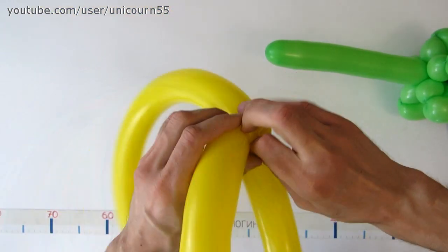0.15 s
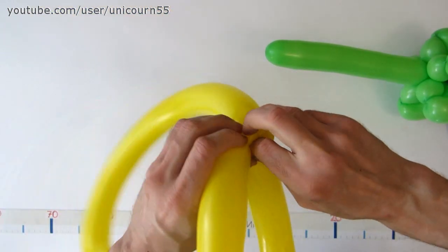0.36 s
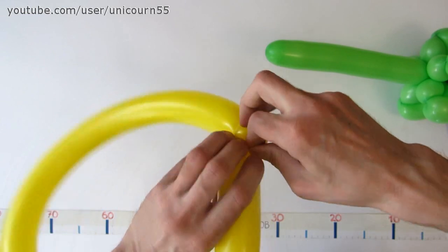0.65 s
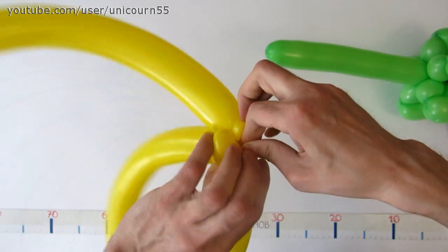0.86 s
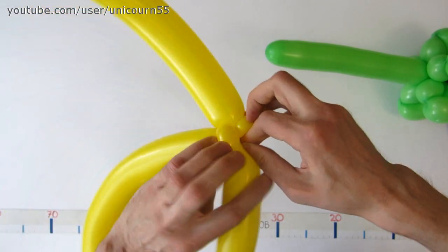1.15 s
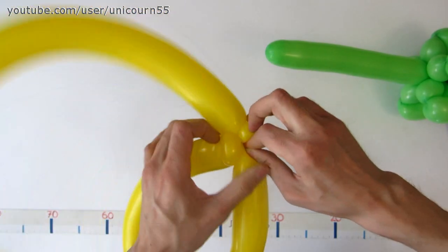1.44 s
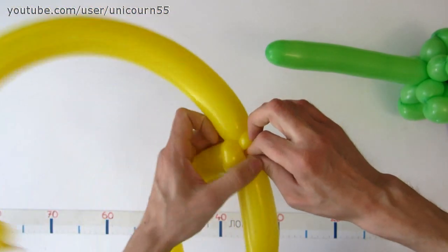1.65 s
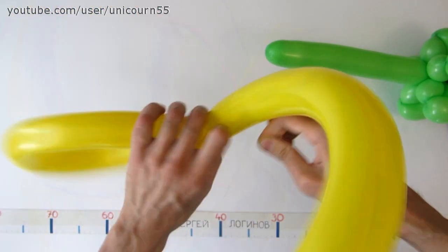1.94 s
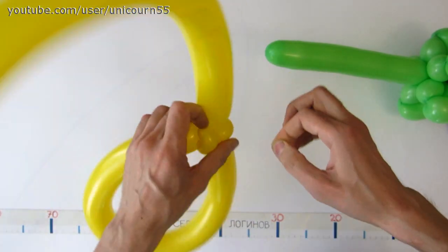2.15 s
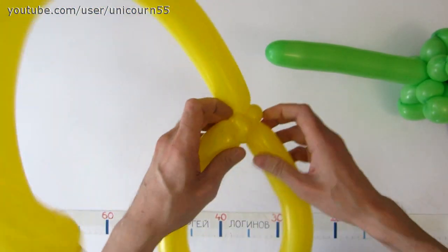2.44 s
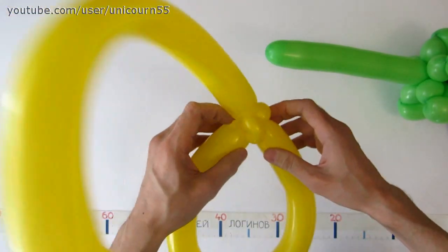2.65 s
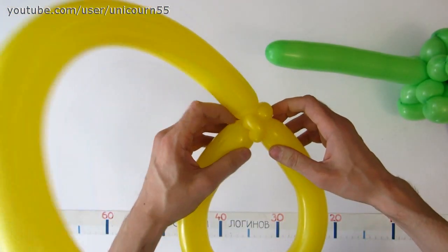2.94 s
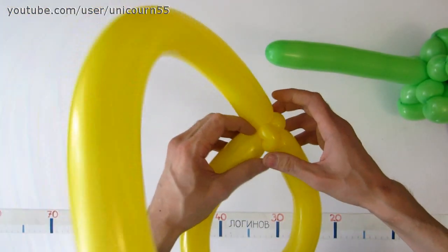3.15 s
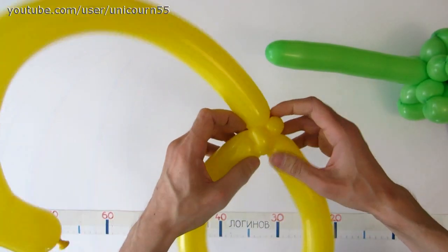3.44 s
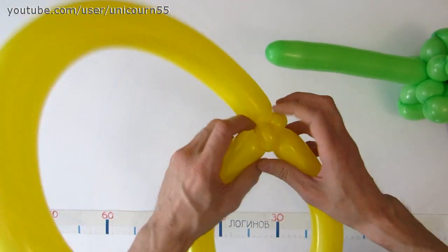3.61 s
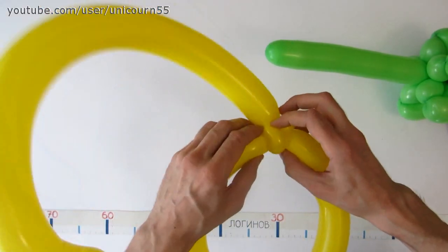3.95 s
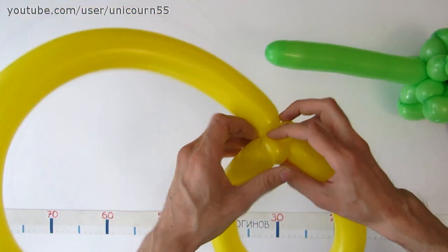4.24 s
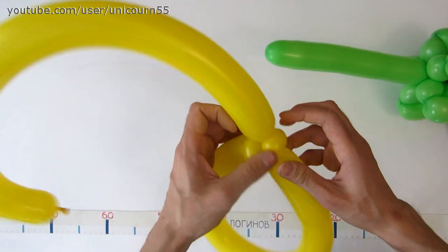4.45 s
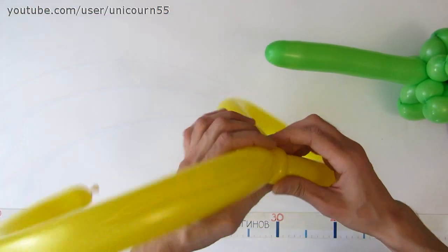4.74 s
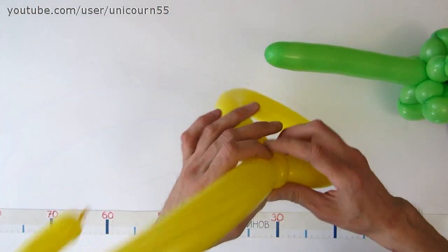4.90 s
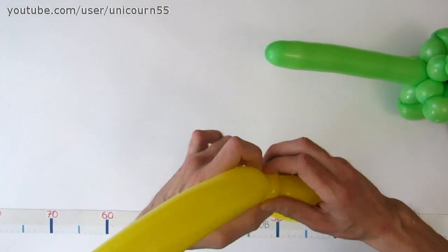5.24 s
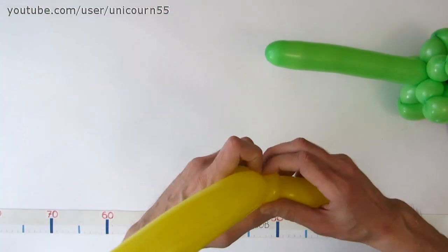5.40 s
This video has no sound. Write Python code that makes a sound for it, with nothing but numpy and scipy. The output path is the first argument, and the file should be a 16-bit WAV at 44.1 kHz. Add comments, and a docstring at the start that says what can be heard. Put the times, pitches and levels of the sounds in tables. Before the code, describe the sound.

Fingers twist a long, tight latex balloon, heard very close in a quiet, dry room. From 0 to 1.1 s, gritty rubber crackle is mixed with irregular bright snaps, a short low creak near 0.7 and a tiny high squeak just after 1.0. It drops almost to silence around 1.25, with a soft bump and small creak at 1.3. Strong snaps cluster from 1.55 to 1.85, ending in a hard, hollow knock. From about 1.95 to 2.4 only faint ticks and thin squeaks remain. Light scrapes then build; a short, low rubbery squawk comes at 3.4 and rough creaks at 3.75. From 4 s rubbing thickens with frequent snaps, especially at 4.4, 5.0 and a sharp one at 5.1, followed by a brief squeaky groan. Crackling continues to the end at about 5.5. Tight hollow tails, low handling rumble and faint hiss; stereo leans left.

```python
"""At a table, close to a microphone with two openings, fingers twist a long latex balloon.
Rubber sticks and slips on skin and rubber: dense tiny slips crackle, large ones snap, and
regular ones creak or squeak. Every slip rings the tight rubber wall, runs along the air tube
inside and dies in a short tail. Soft bumps, a low rumble and a faint hiss lie with them."""
import sys
import numpy as np
from scipy import signal
from scipy.fft import rfft, irfft, next_fast_len
from scipy.io import wavfile
from scipy.ndimage import uniform_filter1d

SR = 44100
rng = np.random.default_rng(int(sys.argv[2]) if len(sys.argv) > 2 else 0)


def generate_wav(sig):
    """Save sig (samples, or channels by samples) to the path in sys.argv[1] as 16-bit PCM at SR."""
    pcm = np.round(np.clip(np.atleast_2d(sig).T, -1, 1) * 32767).astype(np.int16)
    wavfile.write(sys.argv[1], SR, pcm)


N = 245681

# single large slips, levels ahead of boost, tube and microphone:
# (time [s], peak level [dB], centre of colour [Hz])
SNAPS = [(0.0762, -15, 4250), (0.1057, -13, 4770), (0.1104, -13, 3350), (0.182, -9, 6850),
         (0.188, -7, 4600), (0.1984, -9, 7210), (.2095, -15, 6000), (0.3541, -14, 5390), (0.4199, -8, 3590),
         (0.5028, -12, 5270), (.5165, -13, 5500), (0.5701, -11, 4900), (.603, -18, 4270),
         (0.6384, -13, 4470), (0.7034, -11, 2620), (0.7364, -11, 2800), (0.7776, -8, 2950),
         (0.8155, -5, 5800), (0.835, -12, 3060), (0.8684, -7, 3600), (0.8969, -8, 3140), (.9515, -17, 4000),
         (.9665, -18, 4500), (.9842, -19, 6500), (.9986, -14, 4900), (1.143, -18, 4500),
         (1.1485, -14, 5800), (1.3049, -34, 5000), (1.3239, -22, 5450), (1.3415, -19, 4500),
         (1.3665, -19, 1800), (1.379, -21, 2200), (1.476, -18, 3210), (1.5409, -17, 3020),
         (1.5733, -2, 6220), (1.6267, -9, 4980), (1.6721, -12, 3880), (1.6836, -4, 3540),
         (1.6934, -6, 3560), (1.713, -5, 5940), (1.7734, -18, 3180), (1.7894, -16, 2680),
         (1.8277, -11, 2680), (1.8397, -6, 3910), (1.8497, -6, 3370), (2.051, -28, 2600),
         (2.1445, -25, 2560), (2.2475, -25, 3000), (2.3191, -26, 3200), (2.4394, -18, 2520),
         (2.588, -20, 4500), (2.6239, -24, 3200), (2.811, -23, 3340), (2.8719, -19, 2850),
         (2.8833, -18, 3550), (2.9312, -22, 3640), (3.0315, -18, 3600), (3.0405, -15, 3510),
         (3.0645, -19, 4500), (3.1537, -17, 4730), (3.1951, -14, 2760), (3.5129, -22, 3960),
         (3.5379, -21, 4540), (3.5703, -19, 3240), (3.595, -20, 1900), (3.701, -17, 2500),
         (3.7368, -11, 2200), (3.8791, -23, 6200), (3.9055, -21, 3500), (4.0038, -15, 3240),
         (4.0253, -14, 6240), (4.0861, -14, 6140), (4.1714, -11, 2200), (4.2063, -13, 4570),
         (4.2418, -12, 3700), (4.3889, -7, 2970), (4.4408, -18, 2700), (4.533, -14, 2500),
         (4.5521, -13, 3380), (4.6409, -15, 3570), (4.702, -13, 4000), (4.7301, -13, 4930),
         (4.7446, -9, 2530), (4.8254, -13, 3040), (4.836, -15, 2500), (4.9187, -20, 3060),
         (4.9746, -7, 4500), (4.9874, -13, 2920), (5.0435, -15, 4000), (5.1113, -2, 4140),
         (5.1274, -13, 4060), (5.197, -19, 4500), (5.2066, -15, 6500), (5.2405, -12, 4000),
         (5.2584, -13, 3140), (5.2814, -16, 4710), (5.3018, -15, 6000), (5.3183, -13, 4500),
         (5.3911, -7, 4500), (5.4315, -16, 3500), (5.4575, -14, 5000)]
# broad modes, the ways the stretched wall can ring: (frequency [Hz], width [Hz], level [dB])
WALL = [(204, 40, -30.5), (345.4, 83, -9.5), (528, 295, -10), (748, 185, -3), (927, 383, -0.5),
        (1400, 520, -1), (1817, 427, -0.5), (2580, 790, -0.5), (3530, 1060, 1), (4840, 1390, -2),
        (6230, 940, -1), (6785, 2150, 0), (8600, 2650, -2), (11150, 3940, -7.5), (13800, 1000, -19)]
WALL_HZ, _, WALL_DB = np.transpose(WALL)


def amp(db):
    """Turns decibels into a plain factor."""
    return 10 ** (np.asarray(db) / 20)


def evened(x):
    """Scales a signal to an average strength (RMS) of 1."""
    return x / np.sqrt(np.mean(x ** 2) + 1e-20)


def read(points, hz):
    """Reads a (frequency, value) curve at any frequency, on a logarithmic frequency scale."""
    f, value = np.transpose(points)
    return np.interp(np.log(hz + 1), np.log(f + 1), value)


def shaped(x, gain):
    """Filters a sound by a function of frequency."""
    size = next_fast_len(N + SR)
    spectrum = rfft(x, size) * gain(np.fft.rfftfreq(size, 1 / SR))
    return irfft(spectrum, size)[..., :N]


def colour(centre_hz, fall_db):
    """Level of each wall mode: it falls away from a centre by fall_db an octave squared."""
    octaves = np.log2(WALL_HZ / np.asarray(centre_hz)[:, None])
    return -fall_db * octaves ** 2


def grip(s, order=1):
    """One column of the steady rubbing while the fingers hold the balloon, read at times s."""
    # steady rubbing: (time [s], level [dB], brightness [dB], level of the lowest modes [dB])
    holds = [(0, -44.5, -5.5, -4), (.07, -36.5, 1, 2.5), (.3, -35, -1, -8), (.6, -36.5, 1.5, 6.5),
             (.7, -30.5, 5, 1.5), (1.14, -40.5, -3.5, -1.5), (1.24, -82, 6, 1), (1.29, -61, -5, 10),
             (1.33, -51, 7, 6.5), (1.82, -32, -2, -14), (1.97, -53, -1, -9), (2.3, -50.5, 3.5, -2),
             (2.42, -40, 0.5, -0.5), (2.91, -44, -0.5, -4), (3.2, -36, 1, -1.5), (3.35, -39, -2.5, -1),
             (3.68, -34.5, -1.5, -0.5), (3.86, -37, -1, 1), (4, -37, -1.5, -5), (4.65, -31.5, -1.5, 2),
             (4.87, -34.5, -4.5, 0.5), (4.9, -40.5, -3.5, 3), (4.95, -34.5, 0, -2.5), (5.3, -34.5, -4, 6.5),
             (5.4, -36, 5, 1), (5.57, -34.5, -5, -14)]
    columns = np.transpose(holds)
    return np.interp(s, columns[0], columns[order])


def rubbing(s):
    """Crackle level in dB (slips x modes): steady grip, swelling scrapes and the trail of each snap."""
    # a finger scrapes the wall: (start [s], length [s], level [dB], centre of colour [Hz])
    scrapes = [(0.073, 0.042, -39, 2210), (0.173, 0.046, -34.5, 9000), (0.228, 0.025, -33, 9000),
               (0.332, 0.065, -33, 4860), (0.487, 0.06, -33.5, 6000), (0.656, 0.065, -37.5, 6600),
               (0.682, 0.14, -34.5, 2210), (0.833, 0.084, -33.5, 6030), (0.98, 0.018, -33.5, 830),
               (1.038, 0.011, -31, 6200), (1.116, 0.051, -37.5, 6030), (1.321, 0.067, -37.5, 600),
               (1.411, 0.023, -37.5, 600), (1.476, 0.14, -35, 2600), (1.661, 0.034, -32, 9000),
               (1.831, 0.031, -24, 1020), (1.87, 0.022, -38, 605), (2.017, 0.063, -49, 2750),
               (2.132, 0.061, -45, 6600), (2.212, 0.042, -44, 590), (2.312, 0.011, -50, 3300),
               (2.431, 0.048, -36, 1220), (2.536, 0.05, -41.5, 1860), (2.743, 0.035, -34.5, 1560),
               (2.942, 0.058, -37, 3570), (3.008, 0.047, -38, 3300), (3.137, 0.03, -32.5, 4130),
               (3.179, 0.052, -30, 9100), (3.395, 0.032, -32, 604), (3.726, 0.084, -29, 1640),
               (3.936, 0.066, -35.5, 990), (4.008, 0.083, -35, 8400), (4.073, 0.058, -31.5, 8300),
               (4.249, 0.029, -29.5, 2420), (4.48, 0.069, -37.5, 4030), (4.725, 0.046, -29, 1810),
               (4.818, 0.064, -37, 980), (5.005, 0.029, -41.5, 3650), (5.106, 0.023, -30.5, 3680),
               (5.447, 0.017, -30.5, 4930), (5.544, 0.02, -34, 9000)]
    rise_db_per_s, fall_db_per_s = 3000, 595  # slopes before and after a scrape
    scrape_swell_db = 2.5  # ends of a scrape under its middle
    scrape_fall_db, scrape_floor_db = 4, 3  # fall of colour, an octave squared; its deepest loss
    hush_db, hush_s = 4, .012
    trail_db, trail_fall_db_per_s, trail_bright_db = -30, 400, 4
    low_db, treble_db, lowest_hz = -2.5, 0.5, 420

    # low and treble regions of the wall: brightness tips them apart
    low = read([(900, 1), (1600, 0)], WALL_HZ)
    high = read([(2800, 0), (4300, 1)], WALL_HZ)
    tilt = high - low
    power = amp(grip(s)[:, None] + grip(s, order=2)[:, None] * tilt) ** 2

    for start, length, db, centre_hz in scrapes:
        before_s = np.maximum(start - s, 0)
        after_s = np.maximum(s - start - length, 0)
        away_db = rise_db_per_s * before_s + fall_db_per_s * after_s
        from_middle = np.clip(2 * (s - start) / length - 1, -1, 1)
        away_db = away_db + scrape_swell_db * from_middle ** 2
        tone_db = np.maximum(colour([centre_hz], scrape_fall_db), -scrape_floor_db) + 4.5
        power = power + amp((db - away_db)[:, None] + tone_db) ** 2

    for start, peak_db, _ in SNAPS:
        # the rubber sticks before it snaps: the crackle sinks just ahead
        nearness = (s < start) * np.maximum(1 - (start - s) / hush_s, 0)
        power = power / amp(2 * hush_db * nearness)[:, None]
        # the snap frees the wall: a bright crackle trails after it
        trail = (s > start) * amp(peak_db + trail_db - trail_fall_db_per_s * abs(s - start))
        power = power + (trail[:, None] * amp(trail_bright_db * tilt)) ** 2

    lowest_db = grip(s, order=3)[:, None] * (WALL_HZ < lowest_hz)
    return 10 * np.log10(power) + low_db * low + treble_db * high + lowest_db


def crackle():
    """Random tiny slips, each with its own colour on top of one that drifts slowly as the grip moves."""
    slips_per_s = 2000
    count = int(slips_per_s * N / SR)
    s = np.sort(rng.random(count)) * N / SR
    size_db = 3.8 * np.minimum(rng.exponential(1, count), 3.0)
    # blend neighbouring modes, so that colours vary smoothly
    own, drift = uniform_filter1d(rng.standard_normal((2, count, len(WALL))), size=2, axis=2)
    drift = uniform_filter1d(drift, size=90, axis=0)
    db = size_db[:, None] + 4.5 * evened(own) + 1.5 * evened(drift)
    # level the chance swells over about 45 slips, so that the crackle keeps to the rubbing level
    power = uniform_filter1d(np.mean(amp(db) ** 2, axis=1), size=45)
    db = db - 10 * np.log10(power * slips_per_s / SR)[:, None]
    return s, db + rubbing(s)


def ring(s, db):
    """Each slip, at its exact time s, strikes every wall mode with its own strength db (slips x modes)."""
    t, out = np.arange(1500) / SR, np.zeros(N)
    # a slip falls between samples, so its click is spread over the nine nearest
    at = np.round(s * SR).astype(int)[:, None] + np.arange(-4, 5)
    offset = at - s[:, None] * SR
    click = np.sinc(offset) * np.cos(np.pi * offset / 10) ** 2
    places = np.clip(at, 0, N - 1).ravel()
    for k, (hz, width, mode_db) in enumerate(WALL):
        mode = np.exp(-np.pi * width * t) * np.sin(2 * np.pi * hz * t)
        mode = mode / np.linalg.norm(mode)  # energy 1
        strikes = amp(db[:, k, None] + mode_db) * click
        train = np.bincount(places, strikes.ravel(), N)
        out += (-1) ** k * signal.oaconvolve(train, mode)[:N]  # every other mode is turned over
    return out


def tube(x):
    """The wave returns inverted from along the air tube: evenly spaced modes; the deep bass is cut steeply."""
    # sound sent back along the tube: (frequency [Hz], share [0 to 1])
    sent_back = [(300, 0.21), (2000, 0.084), (5000, 0.0057)]
    spacing_hz, bass_edge_hz = 200.5, 140

    def gain(hz):
        echo = np.clip(read(sent_back, hz), 0, .4) * np.exp(-2j * np.pi * hz / spacing_hz)
        return (1j * hz / (bass_edge_hz + 1j * hz)) ** 4 / (1 + echo)
    return shaped(x, gain)


def tail(x, first):
    """Sparse echoes of random sign from sample first on, each band dying at its own speed; energy 1."""
    # dying away of the echoes: (frequency [Hz], time to fall by 60 dB [s])
    decay = [(250, 0.023), (1300, 0.08), (4500, 0.045), (12000, 0.03)]
    taps = np.zeros(SR // 8)
    at = np.arange(first, len(taps) - 16, 16)
    taps[at + rng.integers(0, 16, len(at))] = rng.choice([-1., 1.], len(at))
    hz, t, z = signal.stft(taps, SR, nperseg=128)
    fade = amp(-60 * t / read(decay, hz)[:, None])
    taps = signal.istft(z * fade, SR, nperseg=128)[1]
    return signal.oaconvolve(x, taps / np.linalg.norm(taps))[:N]


def tails(x, first):
    """The shape in the hands keeps changing, so the sound passes from one tail to the next."""
    shapes, changes_per_s = 7, 24  # the shapes come round again in turn
    turn = np.arange(N) / SR * changes_per_s / shapes

    def window(k):
        from_middle = ((turn - k / shapes) % 1 - .5) * shapes
        return np.cos(np.pi / 2 * np.clip(from_middle, -1, 1))
    return sum(tail(x * window(k), first) for k in range(shapes))


def rumble():
    """Low noise of the hands on the tube, growing and sinking with the grip."""
    # tone of the rumble: (frequency [Hz], level [dB])
    tone = [(15, -39), (40, 8.5), (120, -16), (200, 10.5), (280, 10), (500, -66)]
    level_db, db_per_grip_db = -72, 1.5  # level at a grip of -41 dB, ahead of the final mix
    noise = evened(shaped(rng.standard_normal(N), lambda hz: amp(read(tone, hz))))
    return noise * amp(level_db + db_per_grip_db * (grip(np.arange(N) / SR) + 41.0))


def hiss():
    """Steady faint noise, drawn separately for the two rows of the scene."""
    # tone of the hiss: (frequency [Hz], level [dB per Hz])
    tone = [(40, -14), (100, -16), (621, -3), (1170, -8), (1330, -5), (4670, -9), (16000, -24)]
    noise = shaped(rng.standard_normal((2, N)), lambda hz: amp(read(tone, hz)))
    return amp(-75) * evened(noise)


def snaps():
    """Large slips: a bright crack of equal energy whatever its colour, with some of the low wall."""
    fall_db, thin_db = 1.1, 11  # fall of colour, an octave squared; extra loss an octave below the centre
    lump_db, low_db = 2.5, -21  # chance favour of some modes; share of the low wall
    s, peak_db, hz = np.transpose(SNAPS)
    below = np.minimum(np.log2(WALL_HZ / hz[:, None]), 0)
    lumps = lump_db * rng.standard_normal(below.shape)
    crack = amp(colour(hz, fall_db) + thin_db * below + lumps)
    crack = crack / np.linalg.norm(crack * amp(WALL_DB), axis=1)[:, None]
    strength = crack + amp(colour(1200 + 0 * hz, 23.0) + low_db)
    # a fixed 16 dB brings a crack of energy 1 to about the peak level in the table
    db = 20 * np.log10(strength) + peak_db[:, None] + 16
    return s + .0006, db  # sounds 0.6 ms after the time in the table


def creak(start, length, first_hz, last_hz, db, hz, fall_db, uneven):
    """Slips that repeat at a gliding rate: slow ones creak, fast even ones squeak and swell."""
    fade_db = 6  # loss over a run
    soft_db, soft_s = 10, .012  # full soft start, for runs that begin at 1000 slips a second or more
    jitter = rng.standard_normal((300, 2))
    t = np.arange(0, length, 1 / SR)
    turns = np.cumsum(np.linspace(first_hz, last_hz, len(t))) / SR
    # one slip for each whole turn
    s = np.interp(np.arange(min(turns[-1], len(jitter))), turns, t)
    soft_start_db = soft_db * min(first_hz / 1000, 1) * np.maximum(1 - s / soft_s, 0)
    jitter = uneven * jitter[:len(s)]
    # faster runs get weaker slips, to keep the overall level
    level = db + 12 * jitter[:, 0] - 10 * np.log10(first_hz / SR)
    level = level - fade_db * (s / length) ** 2 - soft_start_db
    return start + s + jitter[:, 1] / first_hz, level[:, None] + colour(hz + 0 * s, fall_db)


def bumps():
    """The tube bumps hand or table: a low push of a few swings, rising softly, without ring."""
    # pushes, levels ahead of the bass cut: (time [s], peak level [dB], frequency [Hz], length [swings])
    pushes = [(1.115, -50, 110, 2), (1.117, -32, 322, 1.5), (1.3197, -22.5, 796, 1.2), (1.34, -46, 99, 3.7),
              (1.35, -37, 259, 4.7), (1.846, -31, 111, 0.58), (1.8496, -4, 923, 3.2),
              (3.495, -23.5, 520, 1.45), (5.105, -52, 122, 1.6)]
    edge_hz = 45  # a push on a light tube moves little deep bass
    out, t = np.zeros(N), np.arange(2000) / SR
    for s, db, hz, swings in pushes:
        part = out[round(s * SR):][:len(t)]
        u = 4 * hz * t / swings
        part += amp(db) * np.sin(2 * np.pi * hz * t) * np.e * u * np.exp(-u)
    return shaped(out, lambda hz: (1j * hz / (edge_hz + 1j * hz)) ** 2)


def scene():
    """Direct sound and tail; the second row is what only the right port hears."""
    # runs of regular slips: (start [s], length [s], first rate [Hz], last rate [Hz], level [dB],
    # centre of colour [Hz], fall of colour [dB an octave squared], unevenness [share of a period])
    runs = [(.68, 0.072, 165.9, 138, -24, 2100, 34, 0.148), (3.396, .04, 525, 545, -16, 480, 7, .04),
            (3.737, .046, 231.5, 158.3, -19.5, 1750, 11.5, 0.27),
            (3.7895, .021, 178, 235, -19, 1900, .8, 0.013), (5.155, 0.06, 753, 836, -26, 650, 29, 0.074),
            (1.335, 0.028, 102.8, 87.4, -30.5, 1400, 19, 0.118),
            (1.027, .028, 1290, 1400, -27, 4500, .6, .01), (1.045, .19, 1370, 1325, -49, 1330, 25, .03),
            (2.15, 0.068, 1500, 1500, -46, 1520, 22, 0.015), (2.9, .016, 390, 410, -39, 5000, 0, 0.025),
            (2.03, .05, 2500, 2550, -47, 2590, 25, .01), (4.035, .02, 118, 122, -28, 6300, 20, .01),
            (4.1015, .024, 200, 110, -28, 5800, 8, .02)]
    slips = [crackle(), snaps()] + [creak(*row) for row in runs]
    times, strengths = (np.concatenate(column) for column in zip(*slips))
    wall = tube(ring(times, strengths))
    near = wall + amp(-8) * tails(wall, 60) + bumps() + rumble()
    apart = amp(4.5) * tails(wall, 20)
    return amp(-3) * np.array([near, apart]) + hiss()


def record(dry):
    """Two close ports: the right one is weaker, turned in phase and partly unlike; overload; band limit."""
    # lead of the left port in phase: (frequency [Hz], lead [radians])
    lead = [(0, 0), (260, -2.8), (2240, -1.2), (4220, -0.8), (14300, -0.3), (16000, -0.3)]
    # left port over right, ahead of the hand's movement: (frequency [Hz], difference [dB])
    left_over_right = [(60, 4.5), (380, 5.5), (2380, 7), (15000, 4.5)]
    # likeness of the ports: (frequency [Hz], likeness [0 to 1])
    likeness = [(60, 0.4), (500, 1), (1000, 0.92), (2000, 0.72), (4000, 0.85), (12000, 0.45)]
    # the rubbing hand moves towards the left port and back: (time [s], loss at the right port [dB])
    lean = [(0, 3), (1.16, 4.5), (1.23, 6), (1.3, 3.5), (1.88, 4), (1.99, 14), (2.15, 9), (2.5, 4.5),
            (2.65, 5.5), (3.1, 4), (5.57, 2)]
    edge_hz = 16100  # upper limit of the band

    def ports(hz):
        same = np.clip(read(likeness, hz), 0, 1)
        right = amp(-read(left_over_right, hz)) * np.exp(-1j * read(lead, hz))
        gains = np.array([1 + 0 * hz, same * right, np.sqrt(1 - same ** 2) * right])
        return gains * 2 / abs(1 + same * right)  # keeps the level of the ports' shared sum
    left, shared, own = shaped(dry[[0, 0, 1]], ports)
    loss_db = np.interp(np.arange(N) / SR, *np.transpose(lean))
    both = np.clip([left, (shared + own) * amp(-loss_db)], -1, 1)
    band = signal.firwin(255, edge_hz, window=("kaiser", 9), fs=SR)
    return signal.oaconvolve(both, band[None], "same")


dry = scene()
out = record(dry)
generate_wav(out)
```